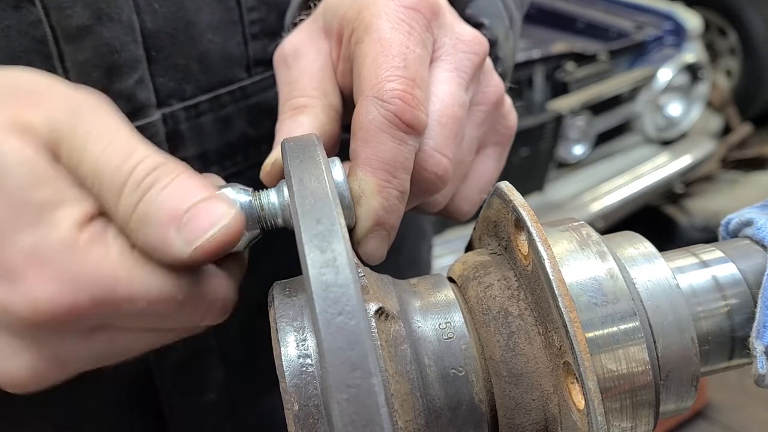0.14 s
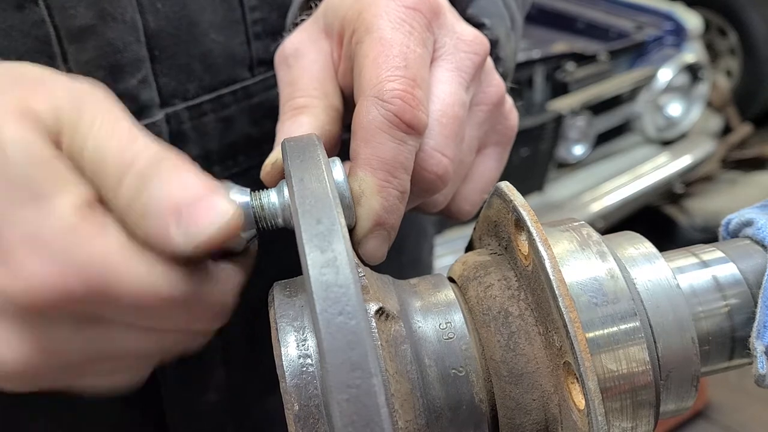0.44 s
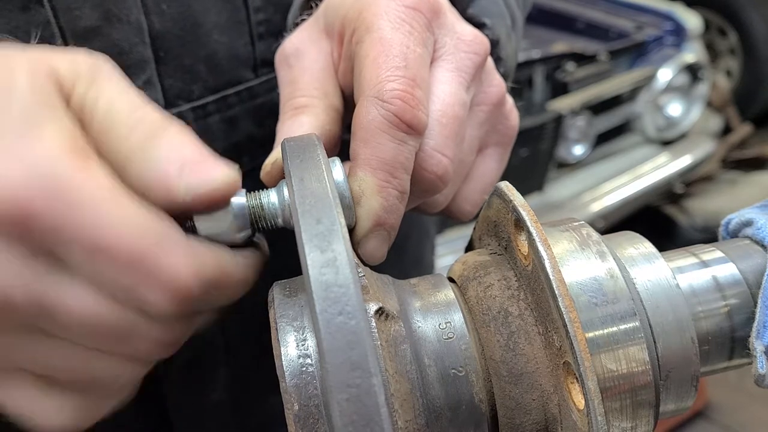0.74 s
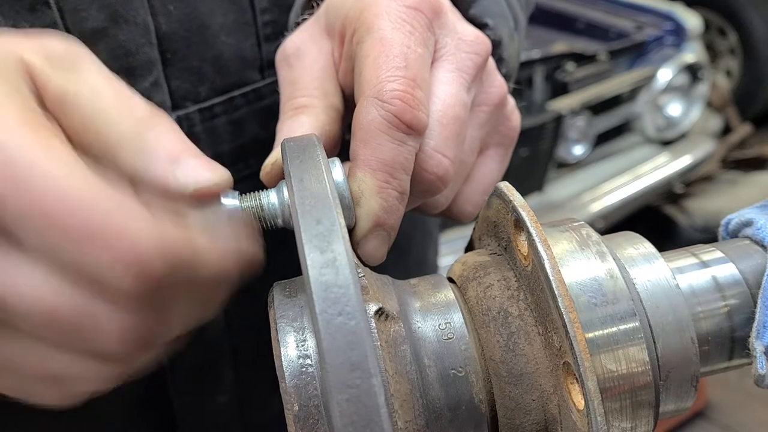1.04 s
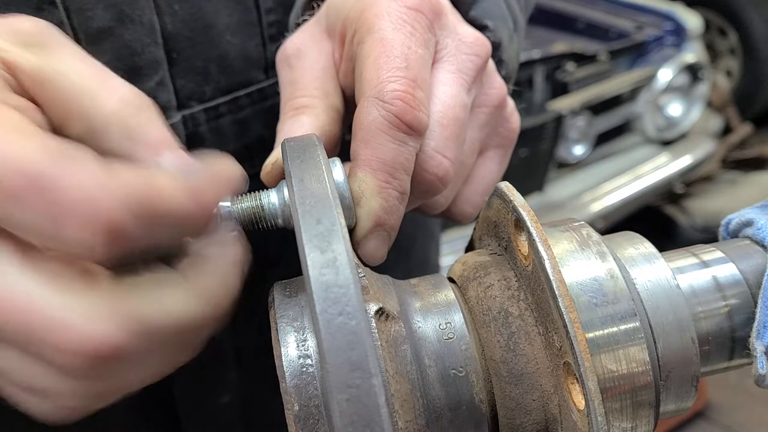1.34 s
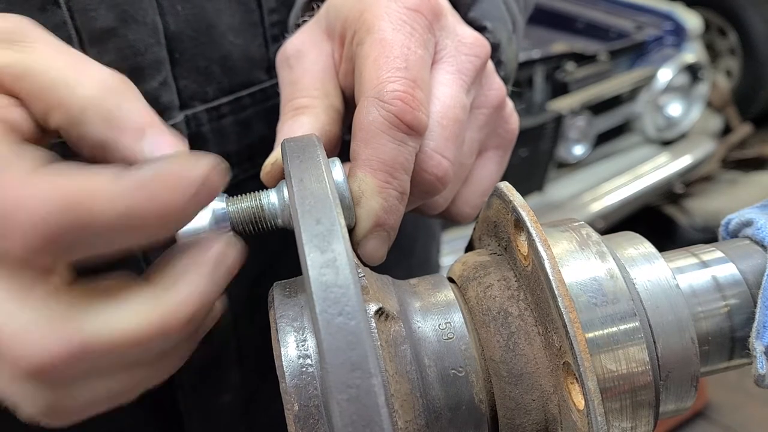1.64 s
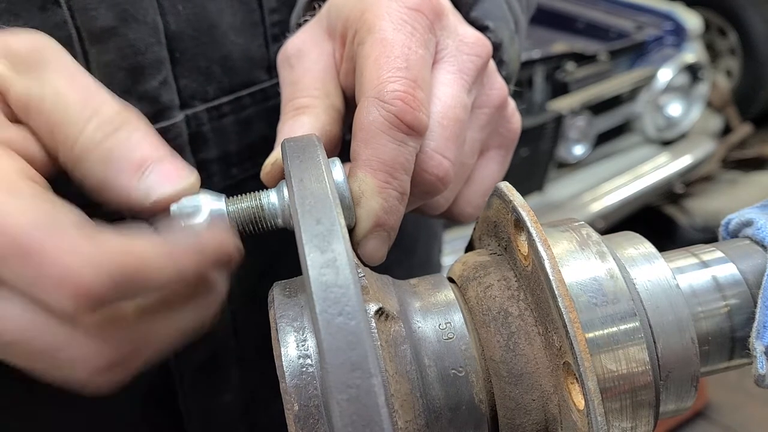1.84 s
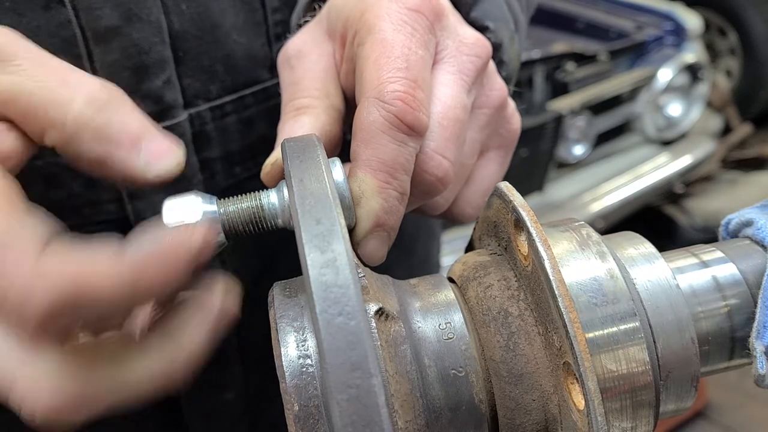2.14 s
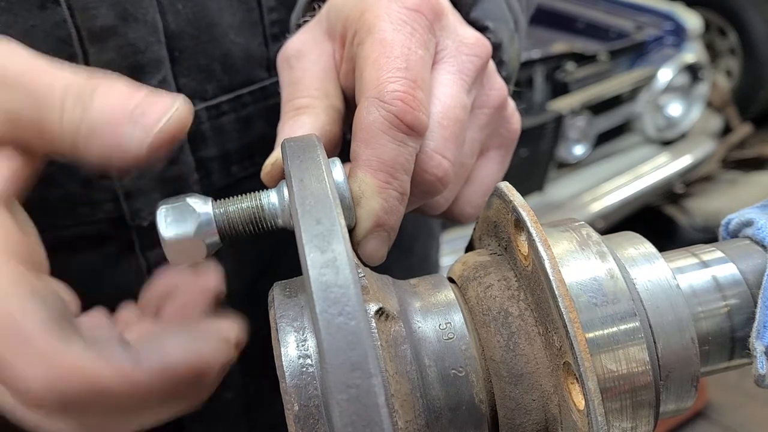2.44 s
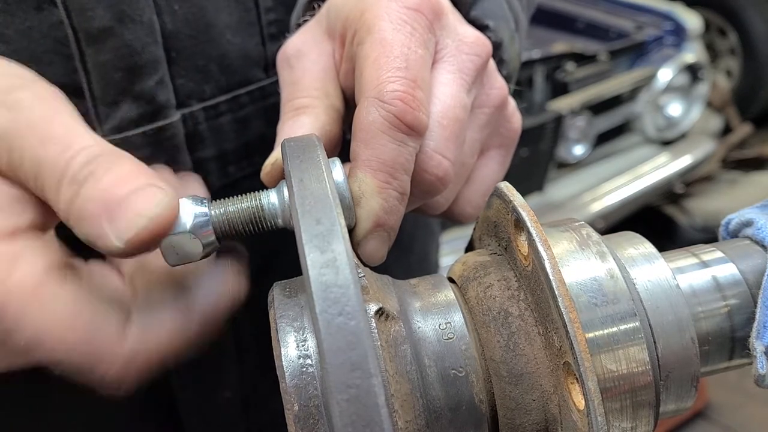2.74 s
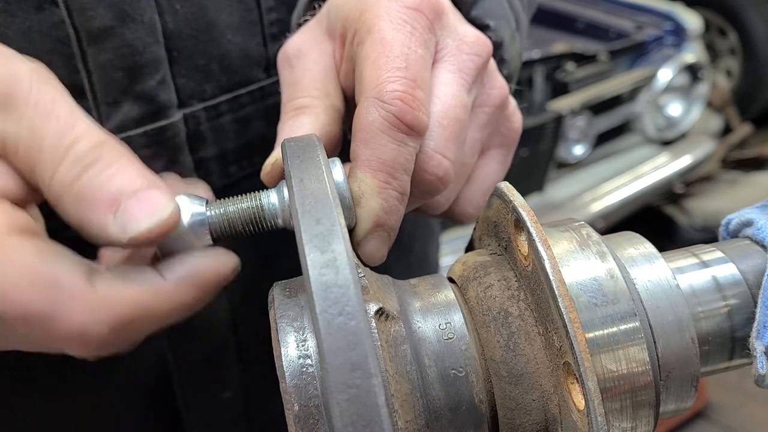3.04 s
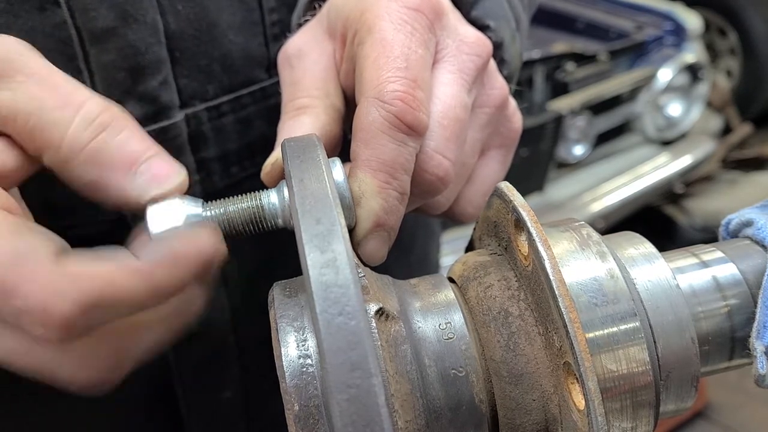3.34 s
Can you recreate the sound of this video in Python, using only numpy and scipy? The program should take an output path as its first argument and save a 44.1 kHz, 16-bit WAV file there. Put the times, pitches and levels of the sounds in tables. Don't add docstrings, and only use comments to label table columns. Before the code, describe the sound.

A steel nut is flicked by hand along a threaded stud, close up in stereo. Thirteen flicks come roughly every 0.27 seconds from 0.14 to 3.27, starting softly, with bright, short-ringing knocks, gritty thread scrape and scattered clinks. Around 1.0 to 1.3 the catches are softer; clinks grow livelier from 1.6 to 2.4. Faint palm thumps, skin hiss, slight creaks near 1.5 and 1.8, and quiet garage hum.

```python
import sys
import numpy as np
from scipy import signal
from scipy.fft import rfft, irfft
from scipy.io import wavfile
from scipy.ndimage import uniform_filter1d

SR = 44100
rng = np.random.default_rng(int(sys.argv[2]) if len(sys.argv) > 2 else 0)


def persist_wave(psi):
    counts = np.round(np.clip(psi, -1, 1) * 32767).astype(np.int16)
    wavfile.write(sys.argv[1], SR, np.atleast_2d(counts).T)


def elevation(decibels):
    levels = np.asarray(decibels, float)
    return 10 ** (levels / 20)


N = 154350


def evened(x):
    return x / np.sqrt(np.mean(x ** 2) + 1e-20)


def read(points, hz):
    f, value = np.transpose(points)
    return np.interp(np.log(hz + 1), np.log(f + 1), value)


def add(mix, s, sound):
    part = mix[round(s * SR):][:len(sound)]
    part += sound[:len(part)]


def slow_change(smooth):
    steps = rng.standard_normal(N // 64 + 1)
    steps = uniform_filter1d(uniform_filter1d(steps, smooth), smooth)
    return np.repeat(evened(steps), 64)[:N]


def ring(force, hz, t60, pan_db=0., lead=0., swell_s=0.):
    turn = np.exp(2j * np.pi * np.cumsum(hz * np.ones(len(force))) / SR)
    decay = np.exp(-np.log(1000) / max(t60, 0.005) / SR)
    swell = np.exp(-1 / (swell_s * SR + 1e-9))
    z = turn * signal.lfilter([1 - swell], np.convolve([1, -decay], [1, -swell]), force / turn)
    left = (z * elevation(pan_db / 2) * np.exp(1j * lead)).real
    right = (z * elevation(-pan_db / 2)).real
    return np.array([left, right])


def tail(t60, seconds, colour):
    t = np.arange(round(seconds * SR)) / SR
    z = rfft(rng.standard_normal((2, len(t))))
    z *= elevation(read(colour, np.fft.rfftfreq(len(t), 1 / SR)))
    h = irfft(z, len(t)) * elevation(-60 * t / t60) * np.minimum(t / 0.00015, 1)
    return h / np.linalg.norm(h[0])


# (t/s, peak level/dB, share into the hub/dB, palm thump/dB, hardness/dB)
CATCHES = [(0.1448, -45, -5, -59, -1), (0.4335, -23, -14.5, -70, 5), (0.7197, -17, -14.5, -36.5, 8.5),
           (0.9954, -45, 1.5, -47.5, -6), (1.2529, -42.5, -25, -39.5, -3), (1.5405, -27, -14.5, -31.5, 3.5),
           (1.7894, -22, -17.5, -38, -4.5), (2.045, -21.5, -19, -34.5, 2.5), (2.2822, -20.5, -23, -39, 5.5),
           (2.523, -23, -21, -37.5, 5.5), (2.7677, -17.5, -25.5, -39, 0), (3.014, -26, -23, -77, 3.5),
           (3.2704, -55, -8, -51, -21)]
# (t/s, peak
# level/dB, share into the hub/dB, flange ring/dB, stud share/dB)
CLINKS = [(0.2204, -30, -16.5, 7.5, -2.5), (0.2376, -30.5, -5.5, -12, 2), (0.4929, -38, -31, -3, -3),
          (0.5184, -34, -19, 8, 7.5), (0.5257, -31, -26, 1, -13), (0.5621, -30, -40, -14, -5),
          (0.7763, -37, -19, -10, 1), (0.8157, -37, -7, 9.5, 11), (1.0392, -40, 0.5, 4.5, 1),
          (1.0572, -33, -9.5, 2, -4), (1.0821, -38.5, -2.5, -6, -5), (1.107, -27.5, -42, 13.5, -3.5),
          (1.2946, -41, -21, 0, -2), (1.3085, -28.5, -24, -6, -12), (1.3385, -35.5, -17, -8, -1),
          (1.5256, -51, -10, -3, -5), (1.5846, -23, -14, -6, -4), (1.5960, -16.5, -19.5, -1.5, 4),
          (1.626, -41, -30, 1, -2), (1.655, -29, -11, -9, -1.5), (1.8640, -32.5, -10, -12, 6),
          (1.8745, -27, -16, 1, 4), (1.8900, -21, -32, 11.5, -1), (1.9164, -22, -21, -12, 0),
          (2.0915, -23.5, -17.5, -8, -6), (2.1242, -36, -13, -2, 0), (2.1379, -18, -26, -0.5, 6),
          (2.203, -46, -6, 7, 5.5), (2.3462, -27.5, -25, -6, -12), (2.358, -23, -27, -16, 0),
          (2.3789, -21.5, -23, 5.5, 1), (2.394, -22.5, -23.5, 7, 7), (2.5178, -44, -14, -13, -2),
          (2.5912, -32.5, -17.5, 2, 3.5), (2.598, -25.5, -20.5, 0, -6), (2.62, -28.5, -15, 3.5, -0.5),
          (2.7648, -38, -14, 7, 1), (3.0965, -37, -19, 5, 2.5), (3.103, -38.5, -19, 1, 4.5),
          (3.3438, -18.5, -18, -9, 7.5)]


def knocks():
    catches = [(s, db, share, -4.5, 0, hard) for s, db, share, _, hard in CATCHES]
    return catches + [(*clink, 0) for clink in CLINKS]


# (f/Hz, t60/s, level/dB)
STEEL_MODES = [(548, 0.11, -4.5), (665.6, 0.026, 7.5), (1164.4, 0.049, -5), (1205.3, 0.042, 4.5),
               (1428, 0.051, -8.5), (2150, 0.038, -7.5), (2670, 0.097, -6), (3457, 0.052, -8), (3676, 0.046, 1),
               (3754, 0.019, 7), (4100, 0.097, 0), (4170, 0.017, 2), (4352, 0.069, 0.5),
               (4813, 0.03, -4.5), (5290, 0.051, -4), (5684, 0.023, -0.5), (5866, 0.083, 0.5), (6047, 0.026, 9),
        (7016, 0.095, -6), (7084, 0.013, 4), (9530, 0.11, -21), (9280, 0.035, -15.5), (9900, 0.09, -19.5),
        (13330, 0.06, -20.5), (13750, 0.035, -19.5), (14640, 0.073, -27)]
# (left over right level/dB, left lead/rad)
STEEL_AIM = [(-8.5, 1.3), (-1.5, 1.68), (-9.5, 3), (-5.5, 2.5), (8, 3.5), (-11.5, 2.5), (10, -1.4),
             (7.5, 3.5), (-4.5, 0.5), (-4, 1.4), (-9.5, -2.5), (-4.5, 0.2), (-6.5, -2),
             (-9, -1.8), (2.5, -2.1), (-9.5, 0.5), (6, 3), (0, 2), (5, 0.4), (6, 0.7), (-4.5, 1.04), (0, 2),
            (1, 2.1), (-2, 1.4), (3.5, 4.5), (11, 2.5)]
FLANGE = (6, 10, 16, 18, 20, 21, 23, 25)


def ringing_steel(hits, high, low):
    hub_below_hz, stud_above_hz, top_above_hz = 1600, 4600, 8000
    hub_db, ring_db, top_per_db = 16.5, -16.5, 1.32
    swell_s, hub_wander, stud_wander = 0.00095, 0.007, 0.004
    place_db, wobble_db = 2.5, 4
    out = np.zeros((2, N))
    for k, ((hz, t60, mode_db), aim) in enumerate(zip(STEEL_MODES, STEEL_AIM)):
        in_hub, on_flange = hz < hub_below_hz, k in FLANGE
        force = (low if in_hub else high) * elevation(-32.5 + wobble_db * slow_change(12))
        for s, db, share, flange, stud, hard in hits:
            level = db + ring_db + place_db * rng.standard_normal()
            if hz > top_above_hz:
                level += hard + top_per_db * (db + 21.5)
            if hz > stud_above_hz:
                level += stud
            if in_hub:
                level += share + hub_db
            elif on_flange:
                level += flange
            add(force, s, np.array([elevation(level)]))
        wander = hub_wander if in_hub else stud_wander
        bend = 1 + wander * slow_change(30) * (not on_flange)
        sound = ring(force, hz * bend, t60, *aim, swell_s * (2.5 if in_hub else 1))
        out += (-1) ** k * elevation(mode_db) * sound
    return out


# (f/Hz, level/dB)
BODY = [(120, -83), (200, -2), (1270, -9.5), (1840, -7), (4270, 5.5), (7270, -5.5), (8900, -38.5),
        (9750, -26), (16000, -24.5)]


def rattling_steel(hits, high):
    t = np.arange(260) / SR
    blows = np.zeros(N)
    for s, db, *_ in hits:
        burst = rng.standard_normal(len(t)) * t * np.exp(-t / 0.0013)
        add(blows, s, elevation(db) * burst / np.linalg.norm(burst))
    drive = elevation(11) * blows + elevation(-3) * high
    half_turns_per_s = 9
    turn = np.pi * half_turns_per_s * np.arange(N) / SR
    out = np.zeros((2, N))
    for face in (np.cos(turn), np.sin(turn)):
        out += signal.oaconvolve((drive * face)[None], tail(0.028, 0.06, BODY), axes=1)[:, :N]
    return out


# (fastest at t/s, scrape level/dB, share into the hub/dB, hand sway/dB)
FLICKS = [(0.231, -43, -0.5, -48), (0.521, -38, -1, -56), (0.807, -38.5, 0.5, -47.5),
          (1.09, -41.5, 2.5, -53), (1.343, -41.5, 0.5, -49.5), (1.62, -37.5, -2, -67),
          (1.876, -41.5, 0.5, -49), (2.126, -42.5, 1.5, -79), (2.372, -40.5, 2.5, -63),
          (2.599, -46, 5, -61), (2.864, -46, -2.5, -61), (3.104, -47, 4, -60), (3.349, -47, 1.5, -50)]


def scrape():
    touch_s, start_db, stop_s, stop_db = 0.012, -23, 0.052, -38
    t = np.arange(N) / SR
    db, low_db, sway_db = np.full((3, N), -120.)
    for (start, *_), (top, level, share, sway) in zip(CATCHES, FLICKS):
        on = (t >= start - touch_s) & (t < top + 3 * stop_s)
        u = t[on]
        speeding = start_db * (1 - (u - start) / (top - start))
        slowing = stop_db * ((u - top) / stop_s) ** 2
        shape = np.where(u < top, speeding, slowing)
        db[on] = level + shape
        low_db[on] = level + share + shape * 0.46
        sway_db[on] = sway - 12 * ((u - start - 0.07) / 0.06) ** 2
    grit_per_s, grit_db = 900, 4.5
    grains = rng.random(N) < grit_per_s / SR
    grit = elevation(grit_db * np.minimum(rng.exponential(1, N), 4)) * grains
    roughness = 0.084 + signal.lfilter([0.1], [1, -0.9], grit)
    force = evened(rng.standard_normal(N) * roughness)
    return force * elevation(db), force * elevation(low_db), elevation(uniform_filter1d(sway_db, 800))


# (f/Hz, t60/s, level/dB)
THUMP = [(75.7, 0.098, 17.5), (141.5, 0.062, 22), (188.8, 0.13, 10.5)]


def thump(low):
    push = elevation(-55) * low
    for s, _, _, db, _ in CATCHES:
        add(push, s, np.array([elevation(db - 20)]))
    return sum(elevation(db) * ring(push, hz, t60, -3.5, 0.2, 0.0043) for hz, t60, db in THUMP)


def skin():
    touch_s, hiss_s, snap_s = 0.012, 0.045, 0.003
    t, level = np.arange(N) / SR, np.zeros(N)
    for s, db, *_, hard in CATCHES:
        u = np.maximum(t - s + touch_s, 0) / hiss_s
        level += elevation(-79 + hard) * u * np.exp(1 - u)
        level += elevation(db - 37 + hard) * (t > s) * np.exp(-abs(t - s) / snap_s)
    band = signal.butter(3, [8000, 16500], "band", fs=SR, output="sos")
    return level * evened(signal.sosfilt(band, rng.standard_normal((2, N))))


# (t/s, length/s, from f/Hz, to f/Hz, level/dB)
CREAKS = [
    (1.541, 0.088, 332, 339, -54),
    (1.728, 0.175, 310, 446, -57.5),
]


def holding_hand(sway):
    sway_hz, width_hz = 37, 48
    rock = ring(rng.standard_normal(N), sway_hz, 1.4 / width_hz, -1.5, 0.13, 0.0073)
    out = evened(rock) * sway
    for s, length, from_hz, to_hz, db in CREAKS:
        n = round(length * SR)
        glide = np.linspace(from_hz, to_hz, n)
        creak = evened(ring(rng.standard_normal(n), glide, 0.06, -2, 0.26, 0.01)) * np.hanning(n)
        add(out.T, s, elevation(db) * creak.T)
    return out


def wall_echo(metal):
    colour = [(300, 1), (2500, 0.5), (16000, -7)]  # (f/Hz, level/dB)
    return elevation(-12) * signal.fftconvolve(metal, tail(0.15, 0.38, colour), axes=1)[:, :N]


# (f/Hz, width/Hz, level/dB)
HUMS = [(67, 7.6, -68), (176.3, 11, -70)]


def machinery():
    out = np.zeros((2, N))
    for hz, width, db in HUMS:
        out += elevation(db) * evened(ring(rng.standard_normal(N), hz, 3.4 / width, -0.88, 0.074, 0.0076))
    return out


# (f/Hz, level/dB)
ROOM = [(20, -22), (65, 8.5), (130, -16.5), (400, -20), (2500, -23.5), (6700, -36.5), (7900, -53.5),
        (13000, -39.5)]
# (f/Hz, likeness 0 to 1)
ALIKE = [(60, 0.87), (200, 0.88), (450, 0.62), (700, 0.06)]


def garage():
    frames, hz = N // 256 + 5, np.fft.rfftfreq(1024, 1 / SR)
    a, b, c, d, patches = rng.standard_normal((frames, 513, 5)).T
    patches = evened(uniform_filter1d(uniform_filter1d(patches, 10, 0), 14, 1))
    same = np.clip(read(ALIKE, hz), -1, 1)[:, None]
    left = a + 1j * b
    right = same * left + np.sqrt(1 - same ** 2) * (c + 1j * d)
    z = np.array([left * elevation(-2.5 * same), right])
    z *= elevation(read(ROOM, hz)[:, None] + patches)
    return elevation(-60) * evened(signal.istft(z, nperseg=1024, noverlap=768)[1][:, :N])


def scene():
    high, low, sway = scrape()
    hits = knocks()
    metal = ringing_steel(hits, high, low) + rattling_steel(hits, high)
    hands = thump(low) + skin() + holding_hand(sway)
    return metal + wall_echo(metal) + hands + machinery() + garage()


def roll_off(x):
    return signal.sosfilt(signal.butter(12, 16980, fs=SR, output="sos"), x)


def record(dry):
    mask_above_hz, mask_db = 7670, -38
    hz, _, z = signal.stft(dry, SR, nperseg=1024)
    power = abs(z) ** 2
    bands = power[:, :512].reshape(2, 32, 16, -1).sum(axis=2)
    bands = np.repeat(bands, 16, axis=1)
    loudness = signal.lfilter([0.7], [1, -0.3], power[:, 48:].sum(axis=1))[:, None]
    keep = 1 / (1 + (loudness * elevation(2 * mask_db) / (bands + 1e-30)) ** 4)
    z[:, :512] *= np.where(hz[:512, None] > mask_above_hz, keep, 1)
    cut = signal.istft(z, SR, nperseg=1024)[1][:, :N]
    cut = signal.oaconvolve(cut, signal.firwin(101, 16000, fs=SR)[None], "same")
    return roll_off(cut)


dry = scene()
out = record(dry)
persist_wave(out)
```